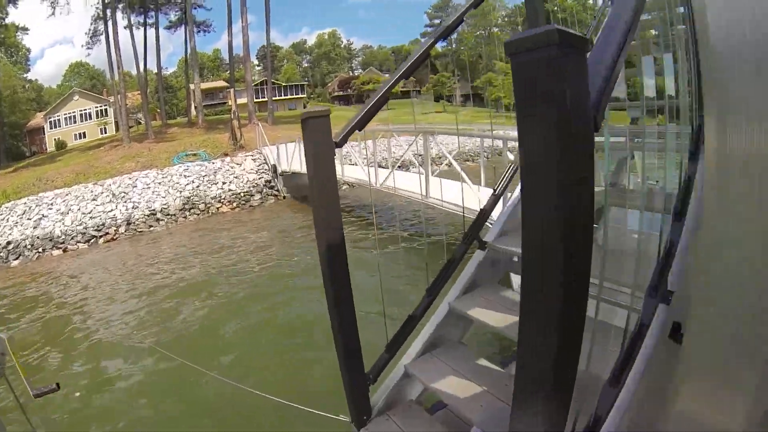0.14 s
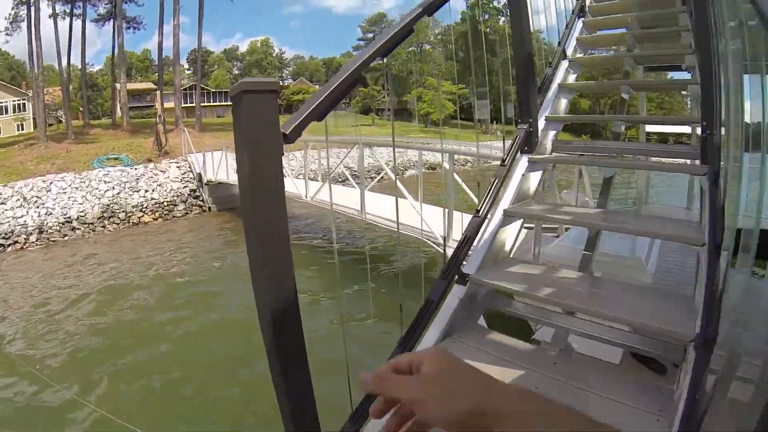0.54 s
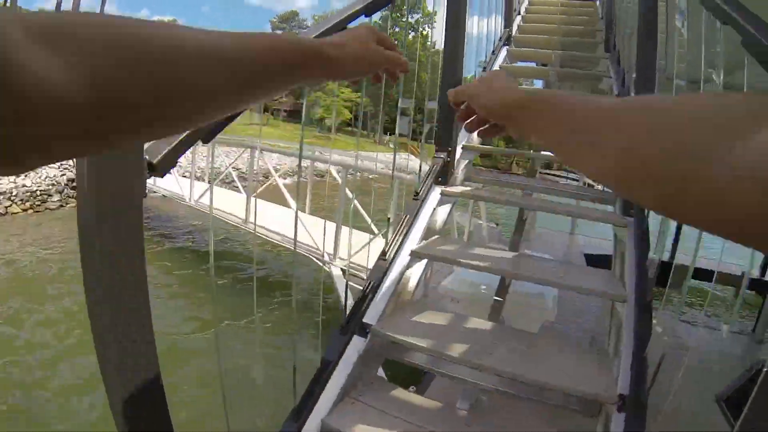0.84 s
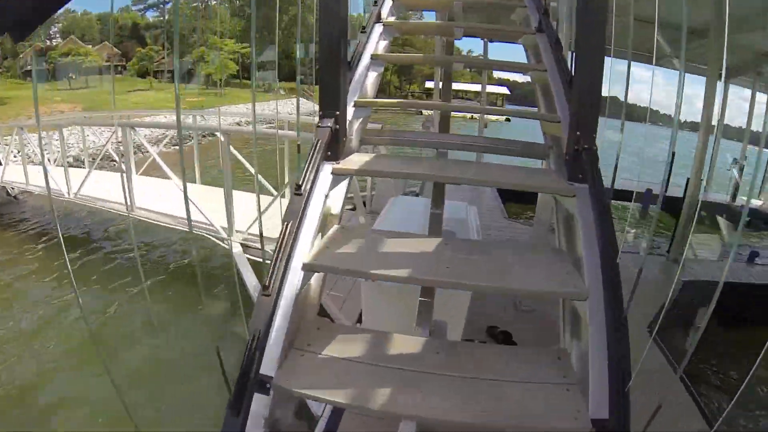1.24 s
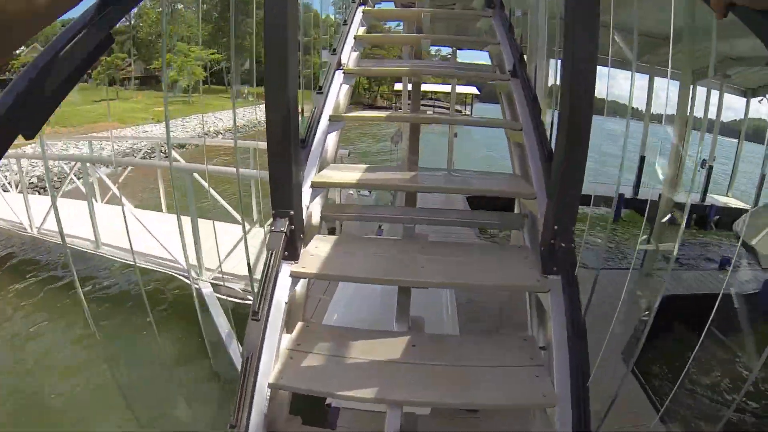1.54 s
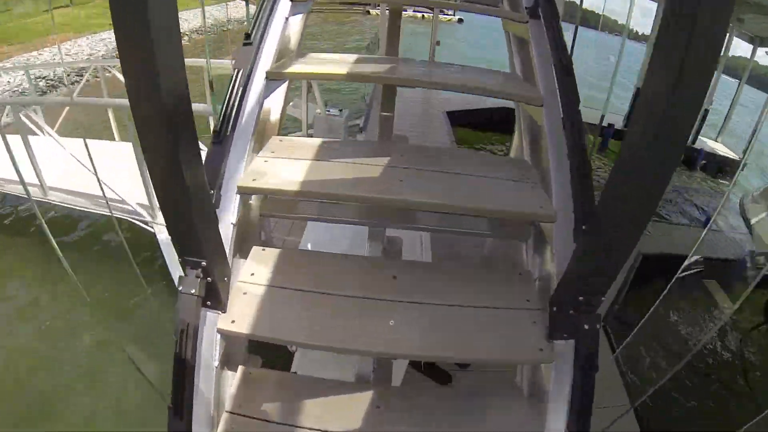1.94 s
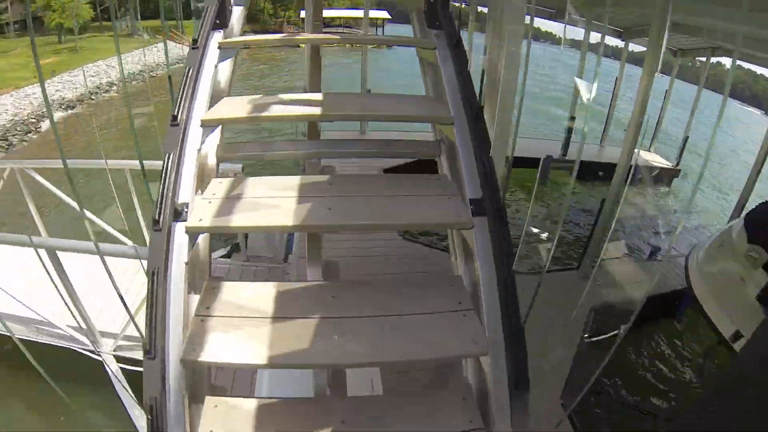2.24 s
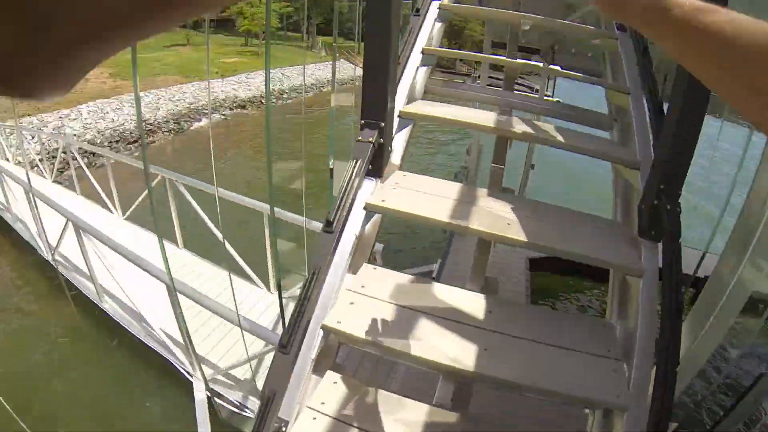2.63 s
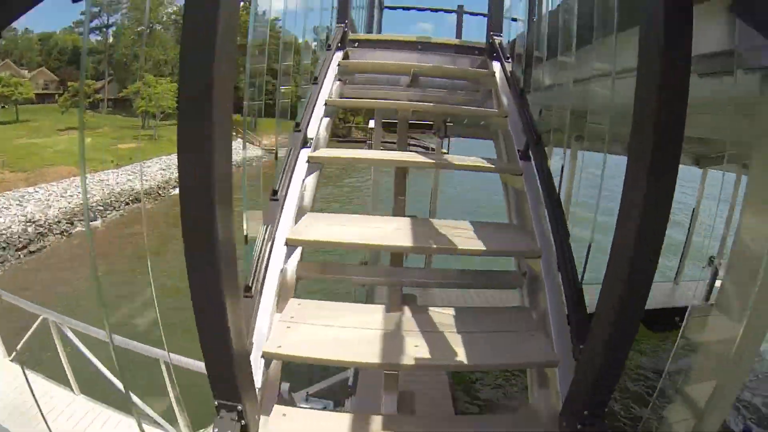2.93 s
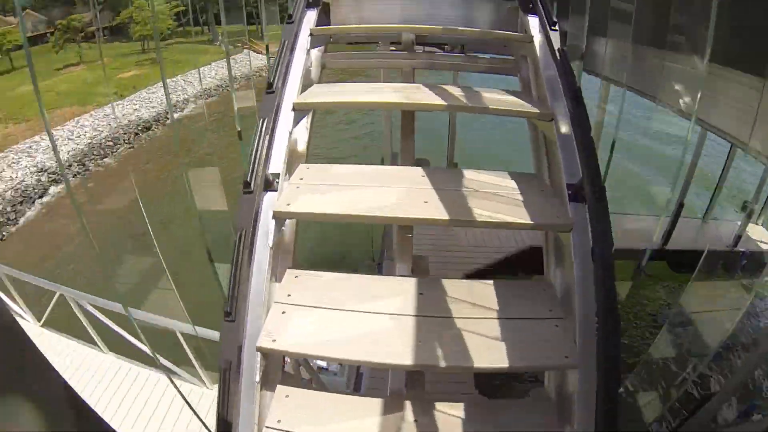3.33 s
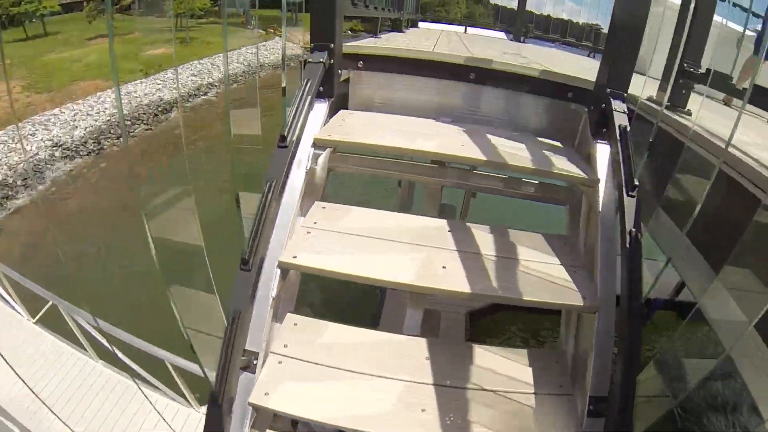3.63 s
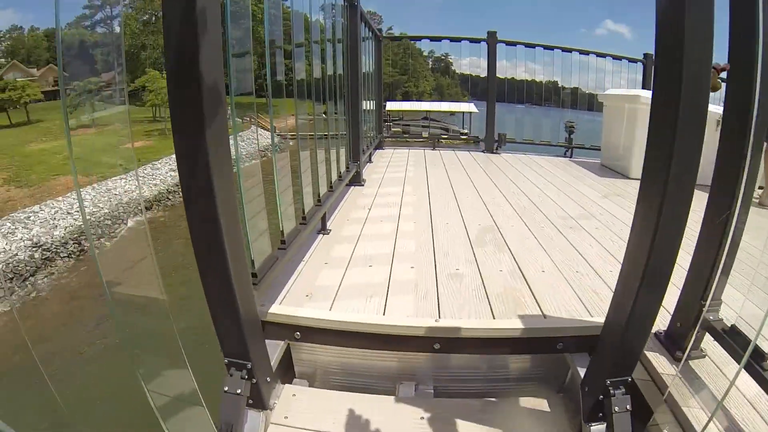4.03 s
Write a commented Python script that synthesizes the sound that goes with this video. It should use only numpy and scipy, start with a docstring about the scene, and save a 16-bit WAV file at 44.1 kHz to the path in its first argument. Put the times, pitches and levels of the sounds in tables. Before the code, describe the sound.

Footsteps thud up outdoor steps, jolting a plastic camera case into sharp knocks and scuffs over gusty wind rumble.

```python
"""A camera in a hard plastic case is carried up outdoor stairs in a breeze.
From the start, wind buffets the microphone opening and a faint hiss comes through the case.
Each step jolts the case: knocks and rubs make it ring briefly; footfalls and gusts add low thumps.
About a second in come a far chirp, the ping of a loose part and a thin tick; each returns later.
The loudest knocks touch full scale, and two more chirps and a last tick come near the end."""
import sys
import numpy as np
from scipy import signal
from scipy.fft import rfft, irfft
from scipy.io import wavfile
from scipy.ndimage import uniform_filter1d

SR = 44100
rng = np.random.default_rng(int(sys.argv[2]) if len(sys.argv) > 2 else 0)


def materialize(psi):
    """Save the field psi as 16-bit PCM at rate SR to the path in sys.argv[1].

    A 1-D psi becomes a single channel; in a 2-D psi each row is a channel.
    """
    bounded = np.clip(np.atleast_2d(psi).T, -1, 1)
    quanta = np.round(bounded * 32767).astype(np.int16)
    wavfile.write(sys.argv[1], SR, quanta)


N = 184117


def amp(db):
    """Turn decibels into a gain."""
    return 10 ** (np.asarray(db) / 20)


def evened(x):
    """Scale a signal to an average power of 1."""
    return x / np.sqrt(np.mean(x ** 2) + 1e-20)


def level_at(curve, hz):
    """Read a level between the (f/Hz, level/dB) points of a curve."""
    f, db = np.transpose(curve)
    return np.interp(np.log(hz + 1), np.log(f + 1), db)


def add(mix, start, sound):
    """Mix in a sound at a start time in seconds."""
    part = mix[round(start * SR):][:len(sound)]
    part += sound[:len(part)]


def shaped_noise(size, colour_db):
    """Noise built from short frames; colour_db(hz, t) says how strong each pitch is at each time."""
    hz = np.fft.rfftfreq(size, 1 / SR)[:, None]
    t = np.arange(4 * N // size + 5) * size / 4 / SR
    real, imag = rng.standard_normal((len(t), len(hz), 2)).T
    spectra = (real + 1j * imag) * amp(colour_db(hz, t))
    return evened(signal.istft(spectra, nperseg=size, noverlap=3 * size // 4)[1][:N])


def wind():
    """Air pushes on the microphone opening: a low rumble, made lumpy by quick swirls."""
    # the breeze over time: t/s, level/dB, tilt under 400 Hz/(dB per octave)
    breeze = [(0.0, -20.5, 1.5), (0.2, -25.5, 0.5), (0.33, -35, 0.5), (0.57, -22.5, 5), (0.7, -26.5, 0),
              (0.88, -41.5, 2.5), (1.09, -16.5, 1), (1.23, -11.5, 1.5), (1.36, -30, 1.5), (1.52, -27, -2.5),
              (1.7, -17.5, 1), (1.88, -15.5, -1.5), (2.08, -26, -1), (2.2, -20.5, -6.5),
              (2.33, -32.5, -1.5), (2.45, -14, 1), (2.6, -37.5, -1), (2.69, -33, 3), (2.9, -17, -2.5),
              (3.15, -22.5, -0.5), (3.33, -18.5, -2.5), (3.6, -18.5, 0), (3.85, -18.5, -1.5),
              (4.17, -17.5, -0.5)]
    # tone colour of the rumble: f/Hz, relative level/dB
    rumble = [(7.1, -31), (12, 6), (86, -1), (268, -24.5), (421, -27.5), (605, -41), (699, -33.5),
              (765, -48), (900, -39.5), (1170, -73), (1980, -120)]
    times, level_db, tilt = np.transpose(breeze)

    def colour(hz, t):
        octaves = np.log2(np.clip(hz, 12, 400) / 60)
        return level_at(rumble, hz) + np.interp(t, times, tilt) * octaves
    swirls = evened(uniform_filter1d(uniform_filter1d(rng.standard_normal(N), 900), 900))
    buffeting = evened(shaped_noise(2048, colour) * amp(3.52 * swirls))
    return amp(np.interp(np.arange(N) / SR, times, level_db)) * buffeting


def hiss():
    """Outdoor hiss, coloured by the case, flickers in patches and as a whole."""
    # loudness of the hiss: t/s, level/dB
    loudness = [(0.0, -49), (0.15, -50.5), (0.52, -47.5), (0.64, -55.5), (0.89, -52.5), (1.29, -44),
                (1.5, -48), (1.86, -48), (1.97, -51.5), (2.4, -51), (2.51, -53), (2.66, -63), (2.79, -58),
                (3.05, -55.5), (3.36, -50.5), (3.75, -48), (4.17, -47)]
    # its tone colour through the case: f/Hz, relative level/dB
    spectrum = [(300, -38.5), (500, -21), (1070, -25.5), (1350, -8), (1600, -15.5), (2000, -25),
                (2750, -26), (3300, -28.5), (4300, -35), (5050, -31), (5800, -42.5), (7300, -38.5),
                (9000, -46.5), (11000, -47.5), (14000, -60.5), (16000, -82.5)]

    def colour(hz, t):
        patches = rng.standard_normal((len(t), len(hz))).T
        patches = evened(uniform_filter1d(uniform_filter1d(patches, 8, axis=0), 12, axis=1))
        flicker = evened(uniform_filter1d(rng.standard_normal(len(t)), 6))
        return level_at(spectrum, hz) + 1.7 * patches + 1.6 * flicker
    level_db = np.interp(np.arange(N) / SR, *np.transpose(loudness))
    return amp(level_db) * shaped_noise(512, colour)


def ring_case(force, boosts_db, pitch=1):
    """A force rings the case's own tones; six boosts, low to high, set how well it reaches them."""
    # tones of the case: f/Hz, level/dB, time to fade by 60 dB/s
    tones = [(397.4, -4, 0.029), (547, -6, 0.036), (803, -10, 0.032), (1300, 0.5, 0.022),
             (1520, -2.5, 0.016), (1802, -11, 0.027), (2326, -10, 0.021), (2623, -10, 0.015),
             (3237, -13.5, 0.02), (3620, -19, 0.022), (4220, -28.5, 0.012), (4570, -28, 0.0099),
             (5000, -16, 0.015), (5730, -6.5, 0.0041), (6810, -21.5, 0.013), (6970, -39.5, 0.0047),
             (8130, -48.5, .006), (10400, -56.5, .004), (12900, -73, .003)]
    # where the boosts apply, plus a third point that stays at 0 dB: f/Hz
    boost_hz = [500, 780, 1270, 1450, 1780, 2300, 6000]
    curve_db = np.insert(boosts_db, 2, 0)
    sound = np.zeros(len(force))
    for k, (hz, db, fade) in enumerate(tones):
        pole = np.exp((2j * np.pi * hz * pitch - np.log(1000) / fade) / SR)  # one fading tone
        boost = np.interp(np.log(hz), np.log(boost_hz), curve_db)
        tone = signal.lfilter([1], [1, -pole], force * amp(db + boost) + 0j).imag
        sound += (-1) ** k * tone  # neighbouring tones swing opposite ways
    # contacts last long enough to lose the high treble
    return signal.sosfilt(signal.butter(2, 6740, fs=SR, output="sos"), sound)


def knocks(mix):
    """One blow, then a brief rattle of smaller contacts, rings the case."""
    # blows: t/s, peak/dB, boosts at 500, 780, 1780, 2300 and 6000 Hz/dB, pitch factor,
    # rattle fade time/s, rattle level against the blow/dB
    blows = [(0.0631, 1.5, -5, -8, -5, -7, -12.5, 0.95, 0.0032, -21.5),
             (0.4585, -25, 12, 10.5, -7, 2, -26, 0.65, 0.0016, -29),
             (0.649, -18, 10.5, 16, -13, -8, -25, 0.8, 0.0023, -25),
             (1.0723, -14, -30, -12, 2.5, -5, -4.5, 0.977, 0.00074, 4),
             (1.2036, -14, 7, 10.5, -4, -3, -16, 1.02, 0.00055, -19),
             (1.2283, -19, -7, -5, 0, 1, -23, 1.14, 0.0037, -21),
             (1.68, -25, 3.5, -2, -9, 4.5, 2.5, 1.25, 0.0016, -17),
             (1.9075, 1, -4, 0, -2, -4.5, -48, 0.96, 0.0012, -32),
             (2.4752, -0.5, -17, -13, -8, -1.5, -12, 1, 0.0023, -9.5),
             (2.684, -6, -6.5, -7, -2, -4, -22.5, 1, 0.0031, -9.5),
             (3.1905, -28.5, 13.5, 0, 1, 5, 2.5, 0.996, 0.0017, -42),
             (3.669, -1.5, -6, 4, 9.5, 0.5, -7.5, 0.95, 0.006, -19.5),
             (3.691, -20, -18, 4, 7, 7, -7, 1.1, 0.0025, -23),
             (3.863, -27, 25, 17, -7, -9, -24, 1.18, 0.0045, -5),
             (3.8909, -24, 0, -1, 3, -18, -29, 1.03, 0.0022, -27)]
    t = np.arange(3000) / SR
    for start, db, *boosts_db, pitch, rattle_fade, rattle_db in blows:
        force = amp(rattle_db) * rng.standard_normal(len(t)) * np.exp(-t / rattle_fade)
        force[0] = 1  # the blow itself
        sound = ring_case(force, np.insert(boosts_db, 2, -3), pitch)  # -3 dB at 1450 Hz
        add(mix, start, amp(db) * sound / abs(sound).max())


def rubs(mix):
    """Something sticks and slips on the case: many tiny, uneven contacts ring it and add grit."""
    # strokes: peak t/s, swell/s, fade/s, level before boosts/dB, boost under 800 Hz/dB,
    # boost at 6000 Hz/dB, pitch factor
    strokes = [(0.08, .008, 0.018, -23, 2, -9, 0.99), (0.134, 0.005, 0.013, -31.5, 3, -16, 0.94),
               (0.163, 0.032, 0.025, -34.5, 6, -13, 0.98), (0.23, 0.038, 0.028, -42, 3, -14, 0.96),
               (.362, 0.0051, 0.022, -42, 2, -13, 1.01), (.464, 0.016, 0.011, -42.5, -1, -27, 0.95),
               (.565, 0.021, 0.086, -21, -3, -14, 0.98), (.593, 0.029, 0.032, -19, 5.5, -6, 1.06),
               (.616, .008, 0.026, -7, -10.5, -18.5, 1.006), (0.633, .02, .024, -14, -5, -10.5, 1.05),
               (1.226, 0.019, 0.073, -24, 6.5, -15.5, 0.96), (1.284, 0.014, 0.028, -22, 4.5, -11, 1.02),
               (1.684, 0.011, 0.054, -45.5, 13.5, -11, 0.77), (1.927, 0.015, 0.0074, -14.5, 1, -8.5, 1.04),
               (1.991, 0.013, .015, -41, 3.5, -22, 1.1), (2.016, 0.0081, 0.02, -31.5, 2, -17, 0.98),
               (2.046, 0.0077, 0.023, -41.5, 0.5, -8, 1.1), (2.189, 0.021, 0.061, -37.5, 13.5, -14, 0.89),
               (2.22, 0.013, 0.0098, -12, 1, -10.5, 1.012), (2.299, 0.015, 0.013, -34.5, 5.3, -15, 0.98),
               (2.355, 0.005, .012, -39, -8, -9, 0.95), (2.532, .01, 0.027, -42, 10, -28, 0.93),
               (2.558, .015, .02, -44.5, 9, -7, 0.98), (2.631, 0.0091, 0.022, -55, 15, -2, 1.01),
               (2.724, 0.0069, 0.032, -33, 1.5, -16, .99), (3.044, 0.027, 0.042, -44, 3, 2, 1.07),
               (3.193, 0.0088, .014, -50, -4, 16, 1.2), (3.293, .01, 0.042, -48.5, 8, 6, 1.2),
               (3.475, 0.029, 0.022, -38, -4, -17, 1.02), (3.556, 0.028, 0.037, -45.5, 20, -28, 0.92),
               (3.595, 0.044, 0.024, -41.5, 17.5, -28, 0.88), (3.637, 0.0066, .015, -44, 6, 7, 1.13),
               (3.69, .008, 0.02, -23.5, 4.5, -5, 0.97), (3.729, .014, 0.0096, -23.5, -0.5, -5.5, 0.978)]
    # the gritty part that does not ring: f/Hz, relative level/dB
    grit_colour = [(300, -36), (1500, -13), (4300, -27.5), (7500, -40), (12000, -51), (16000, -64.5)]
    swell_db, fade_db = 12, 18.5  # how far a stroke rises, then falls
    touch_s, lift_s, slips_per_s = 0.008, 0.0014, 3000
    for peak, swell, fade, db, low_db, treble_db, pitch in strokes:
        chance, size, sign = rng.random((8000, 3)).T
        slips = (chance < slips_per_s / SR) * amp(-3.5 * np.log(size + 0.036)) * np.sign(sign - 0.5)
        t = np.arange(len(slips)) / SR - swell - touch_s  # zero at the peak
        level_db = db - np.where(t < 0, -swell_db * t / swell, fade_db * t / fade)
        touch = np.clip((t - t[0]) / touch_s, 0, 1)
        lift = np.clip((fade + lift_s - t) / lift_s, 0, 1)
        stroke = amp(level_db) * touch * lift
        plain_level = np.sqrt(np.mean(ring_case(slips, np.zeros(6)) ** 2))
        ringing = ring_case(slips * stroke, [low_db, low_db, 6, -2, -2, treble_db], pitch) / plain_level
        scratch = 0.42 * evened(slips) + rng.standard_normal(len(t))
        hz = np.fft.rfftfreq(len(t), 1 / SR)
        grit = irfft(rfft(scratch) * amp(level_at(grit_colour, hz)), len(t))
        add(mix, peak + t[0], ringing + grit * stroke * amp(treble_db + 16.5))


def thumps(mix):
    """Footfalls passing through the body, and single gusts, make a few slow swings of pressure."""
    # low jolts: t/s, level/dB, f/Hz, number of swings
    jolts = [(0.1, -19.5, 54.3, 1.2), (0.548, -8.5, 49.5, 1.63), (1.039, -17, 46.2, 5),
             (1.144, -20, 90, 4.3), (1.187, -10, 51.8, 5.6), (1.675, -17.5, 194, 2.16),
             (1.69, -10, 81.5, 8.1), (2.191, -10, 27, 1.73), (2.284, -14.5, 61.4, 0.98),
             (3.675, -18.5, 40.7, 1.8), (3.453, -10, 21.7, .8), (2.41, -14.5, 67, 5.1),
             (3.189, -13, 158, 2.2), (3.297, -14.5, 110.3, 3.5), (3.301, -24.5, 260, 1.6),
             (3.493, -9.5, 60.7, 0.9), (3.786, -12.5, 96, 3.45), (4.021, -24, 65.5, 2.8)]
    for start, db, hz, swings in jolts:
        turns = np.arange(0, swings, hz / SR)
        swell = np.sin(np.pi * turns / swings) ** 1.07
        add(mix, start, amp(db) * swell * np.sin(2 * np.pi * turns))


def chirps(mix):
    """Thin, far-off tones swell and die away."""
    # faint chirps: t/s, length/s, peak/dB, f/Hz
    calls = [(.88, .085, -59.5, 2800), (3.8, 0.018, -55, 2880), (4.1, 0.022, -52, 2740)]
    for start, length, db, hz in calls:
        t = np.arange(0, length, 1 / SR)
        add(mix, start, amp(db) * np.sin(np.pi * t / length) * np.sin(2 * np.pi * hz * t))


def pings(mix):
    """A small loose part rings with one short, high tone."""
    hz, fade_s = 5140, 0.029
    t = np.arange(1500) / SR
    tone = np.sin(2 * np.pi * hz * t) * np.minimum(t / 0.0007, 1)
    for start, db in [(1.0728, -38), (1.679, -31), (3.191, -39.5)]:
        add(mix, start, amp(db - 60 * t / fade_s) * tone)


def ticks(mix):
    """Very short puffs of noise sound as dry ticks with no ring."""
    # puffs: t/s, peak/dB, low edge f/Hz, fade time/s
    puffs = [(1.128, -46, 6000, 0.0042), (1.786, -43.5, 5000, 0.0044), (3.584, -47, 5000, 0.0025),
             (3.93, -41, 2000, 0.0036), (4.0793, -20.5, 250, 0.000016)]
    t = np.arange(600) / SR
    for start, db, low_hz, fade in puffs:
        band = signal.butter(1, [low_hz, 7000], "band", fs=SR, output="sos")
        puff = signal.sosfilt(band, rng.standard_normal(len(t)) * np.exp(-t / fade))
        add(mix, start, amp(db) * puff / abs(puff).max())


def scene():
    """Lay the short sounds over the wind and hiss, in one channel."""
    mix = wind() + hiss()
    for source in (knocks, rubs, thumps, chirps, pings, ticks):
        source(mix)
    return mix[None]


def record(dry):
    """The camera rounds off peaks near full scale, then cuts the highest treble."""
    rounded = dry / (1 + abs(dry) ** 10) ** (1 / 10)
    treble_cut = signal.firwin(511, cutoff=15800, window=("kaiser", 9), fs=SR)
    return signal.oaconvolve(rounded, treble_cut[None], "same")


dry = scene()
out = record(dry)
materialize(out)
```